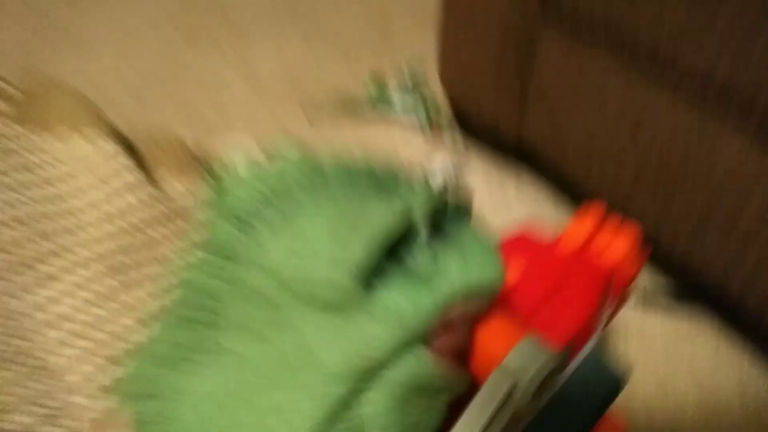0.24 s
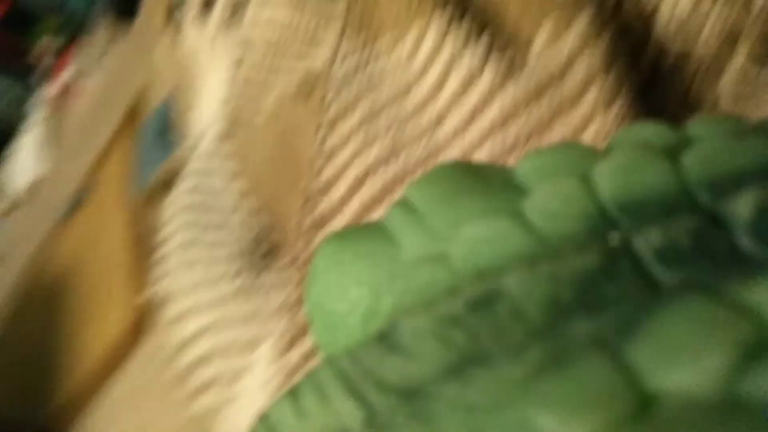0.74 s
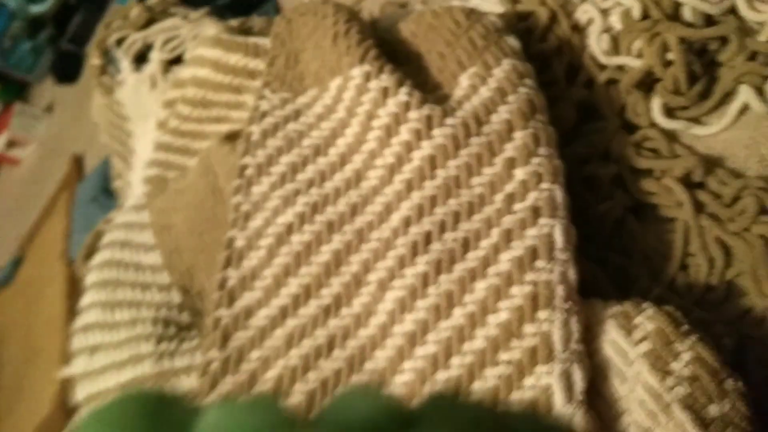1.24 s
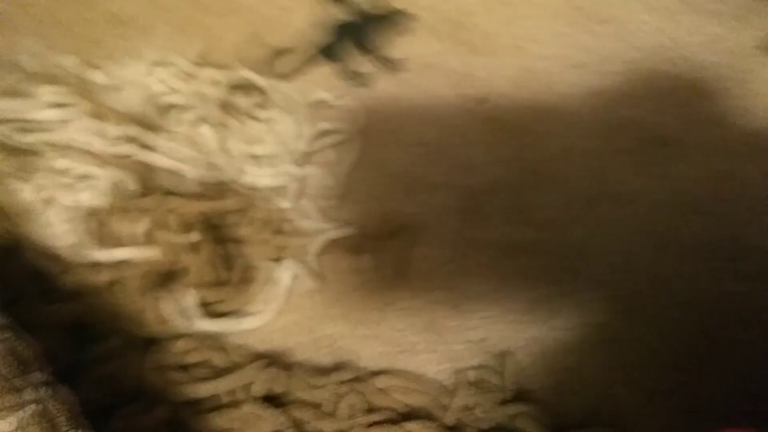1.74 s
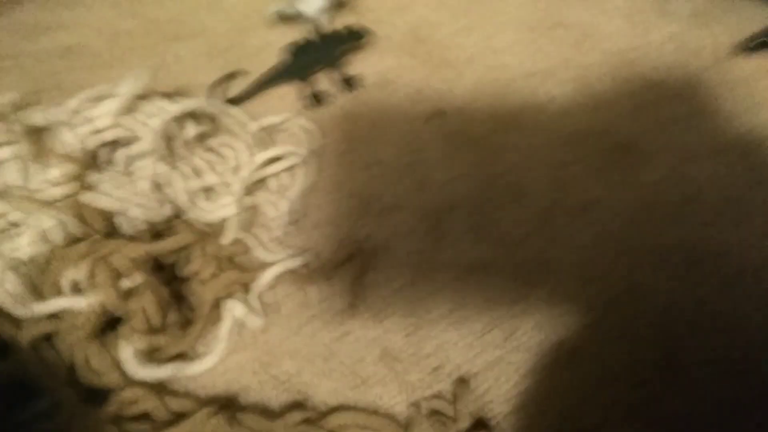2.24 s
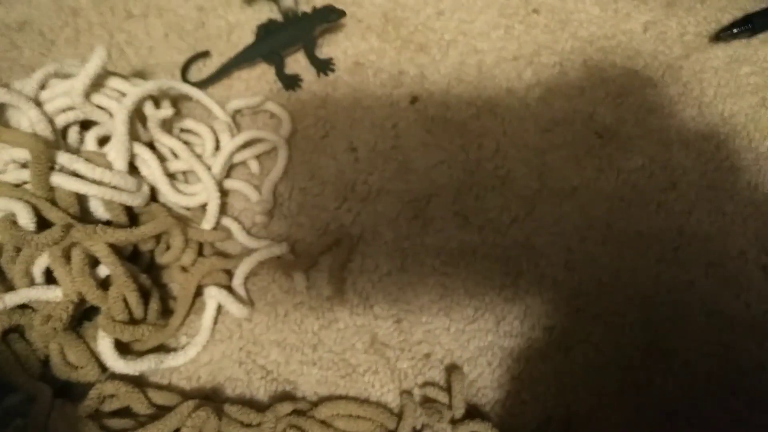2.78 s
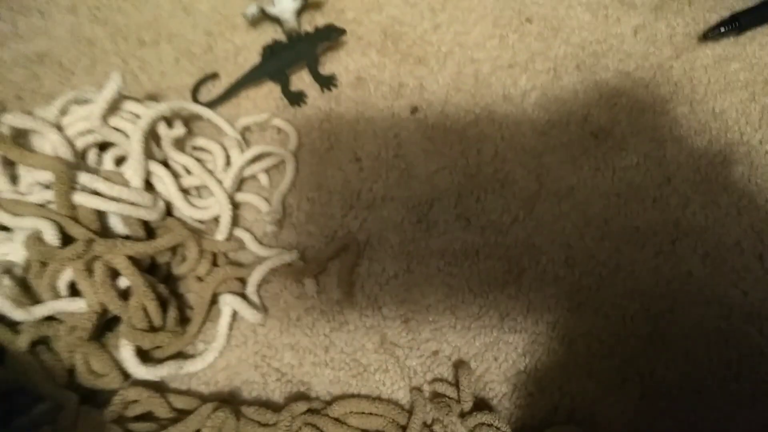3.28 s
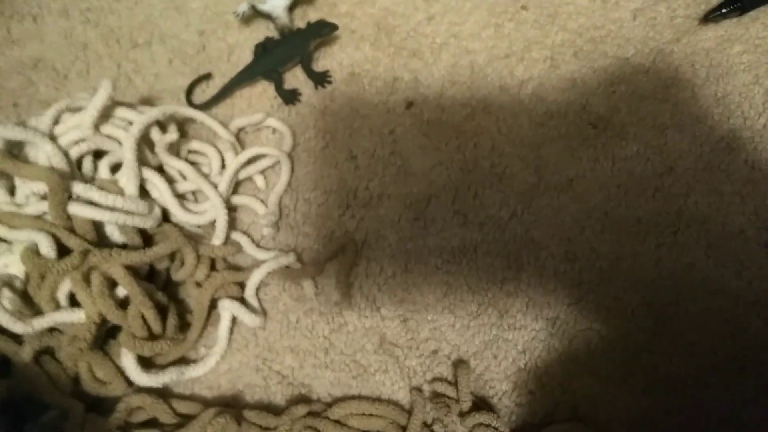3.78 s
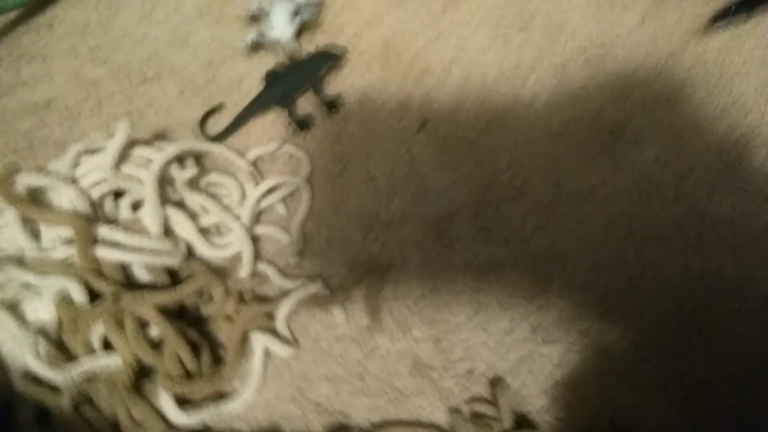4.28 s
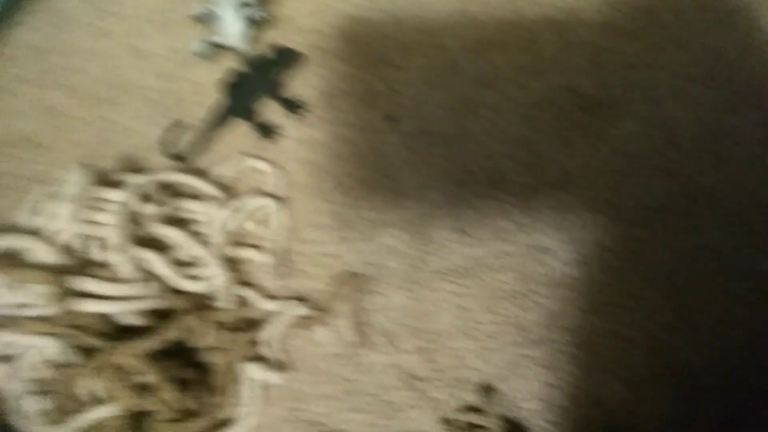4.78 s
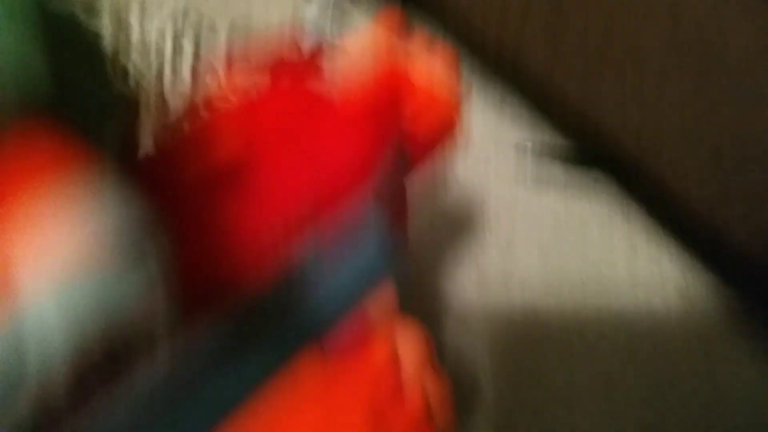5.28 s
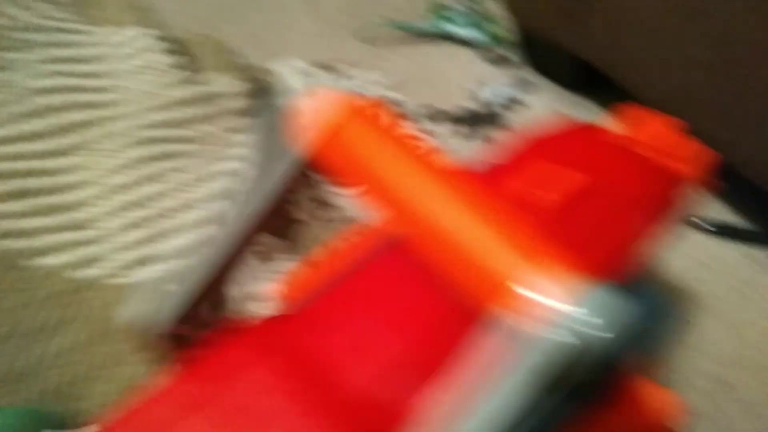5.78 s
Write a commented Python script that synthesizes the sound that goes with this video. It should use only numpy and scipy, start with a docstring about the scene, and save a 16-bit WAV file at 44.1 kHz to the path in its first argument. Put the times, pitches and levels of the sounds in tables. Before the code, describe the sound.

A hollow plastic toy is handled right against the microphone: scraping, sharp clacks and dull knocks, a quiet lull, another hard burst, then faint rustling.

```python
"""Hollow plastic toy in the hand

A hollow plastic toy is handled and dragged right next to a hand-held camera in a carpeted room.
Rubbing is random slips that ring the shell, with a fizz above and a rumble below.
Loose parts click: a blow and a short rattle ring the shell, plus a sharp tick and two high pings.
Knocks thump into the camera body as low swings that die quickly. A faint noise tail is the room.
The left channel is upside down, slightly late and duller than the right, and partly unlike it."""
import sys
import numpy as np
from scipy import signal
from scipy.fft import rfft, irfft, next_fast_len
from scipy.io import wavfile
from scipy.ndimage import uniform_filter1d

SR = 44100
rng = np.random.default_rng(int(sys.argv[2]) if len(sys.argv) > 2 else 0)


def materialize(psi):
    """Save the field psi as 16-bit PCM at rate SR to the path in sys.argv[1].

    A 1-D psi becomes a single channel; in a 2-D psi each row is a channel.
    """
    bounded = np.clip(np.atleast_2d(psi).T, -1, 1)
    quanta = np.round(bounded * 32767).astype(np.int16)
    wavfile.write(sys.argv[1], SR, quanta)


N = 265482

# Strokes of rubbing. Each row: peak time in seconds, swell time in seconds, scrape level in dB,
# fizz level in dB, rumble level in dB, pitch of the rubbed spot in Hz.
STROKES = [(0.0, .1, -40, -40, -43.5, 983), (0.099, 0.42, -62.5, -54, -58.5, 951),
           (.23, 0.11, -33.5, -42, -40.5, 1094), (0.329, 0.38, -42.5, -49, -41.5, 999),
           (.45, 0.29, -50.5, -51.5, -44.5, 893), (0.583, 0.14, -31.5, -44, -36.5, 595.5),
           (0.661, 0.15, -47.5, -42, -42.5, 907), (0.794, 0.21, -37, -45, -58.5, 1245),
           (0.963, 0.87, -42, -47.5, -45, 768), (1.101, 0.3, -37, -44.5, -41, 1034),
           (1.381, 0.042, -44.5, -71.5, -54, 1357), (1.528, 0.17, -61, -60.5, -48.5, 968),
           (1.667, 0.13, -36, -43.5, -35.5, 1234), (1.941, 0.11, -32, -48.5, -40.5, 1735),
           (2.088, 0.11, -34, -48.5, -45.5, 1790), (2.202, .05, -28, -41.5, -64.5, 1819),
           (2.298, 0.41, -46.5, -62, -54.5, 1530), (2.602, 0.44, -57.5, -64, -57, 1067),
           (3.349, 0.31, -54.5, -64.5, -61.5, 843), (3.682, 0.28, -52, -65.5, -61, 1686),
           (4.023, 0.58, -55.5, -60.5, -58, 963), (4.223, 0.11, -34, -45.5, -40, 698),
           (4.398, 0.036, -42, -70.5, -55.5, 1716), (4.479, 0.11, -34, -64.5, -61, 1782),
           (4.541, 0.12, -23.5, -59, -45.5, 1776), (4.61, 0.2, -21.5, -43, -36.5, 1724),
           (4.647, 0.16, -39, -37.5, -41.5, 1075), (4.892, 0.13, -46.5, -51.5, -59, 1035),
           (5.42, 0.15, -53, -54, -85, 927), (5.635, 0.057, -54.5, -62, -67, 900),
           (5.719, 0.15, -50, -63, -61, 794), (5.919, 0.15, -54, -54.5, -58, 792),
           (6.03, 0.072, -50.5, -48.5, -52, 885)]
# How deeply each layer follows a stroke's rise and fall: shares for scrape, fizz and rumble.
FOLLOW_SHARES = (0.85, 0.71, 0.58)
# The faint steady floor between strokes: levels of scrape, fizz and rumble in dB.
REST_FLOOR_DB = (-90, -82, -79)
# Modes (natural tones) of the shell. Each row: pitch in Hz, width in Hz, level in dB.
SHELL_MODES = [(601.4, 158, -3.5), (862.5, 119, -0.5), (970.7, 84, 2), (1133, 136, 0), (1259.5, 55, 3),
               (1433, 130, -2), (1634, 74, 2), (1801, 99, -0.5), (1964, 70, 2.5), (2387, 140, 1.5),
               (2870, 270, -6), (3105, 190, -7.5), (3465, 370, -14), (4740, 820, -21.5)]
# The two large panels of the shell. Each row: pitch in Hz, level under a blow in dB.
PANELS = [(960, -13), (1850, -12.5)]
# Tone colour of the fizzing fibres. Each row: frequency in Hz, relative level in dB.
FIZZ_COLOUR = [(2200, 5.5), (3300, 0.5), (5500, -6.5), (9500, -14), (16500, -18)]
# Tone colour of low rumble. Each row: frequency in Hz, relative level in dB.
RUMBLE_COLOUR = [(30, -26.5), (70, 7), (140, 5), (300, -0.5), (500, -1.5), (800, -40)]
# Parts striking the shell. Each row: time in seconds, level in dB, pitch of the struck part in Hz,
# time for the rattle to fall 60 dB in seconds, level of the tick against the ring in dB.
CLICKS = [(0.201, -21, 1045, 0.076, -16), (0.231, -33, 1069, 0.13, -2.5), (.286, -21, 1252, 0.11, -9.5),
          (0.316, -17.5, 3295, 0.06, -45), (0.407, -33.5, 4395, 0.046, 5.5), (.504, -32.5, 2910, 0.024, -6),
          (0.533, -11, 916, 0.023, -16), (0.645, -23.5, 759, 0.02, -30), (0.689, -18.5, 1347, 0.1, -47),
          (0.723, -22, 1354, 0.091, -10.5), (0.772, -16, 1234, 0.019, -19),
          (0.835, -32.5, 1378, 0.032, -23), (0.91, -18.5, 934, 0.035, -16.5),
          (0.919, -19, 2492, 0.018, -7.5), (1.04, -22.5, 1197, 0.092, -5), (1.049, -9, 934, 0.05, -13),
          (1.088, -23.5, 957, 0.023, -40), (1.145, -22.5, 2915, 0.029, -15),
          (1.172, -11.5, 938, 0.084, -17), (1.191, -7.5, 1055, 0.018, -1.5), (1.347, -31, 1367, 0.23, -24),
          (1.398, -36.5, 1360, 0.1, -16), (1.462, -41, 898, 0.048, -26), (1.496, -38.5, 860, 0.02, -17),
          (1.535, -38, 876, 0.0052, -6.5), (1.589, -14, 2164, 0.023, -12), (1.676, -16, 2054, 0.022, -7.5),
          (1.697, -34.5, 2920, 0.022, -1), (1.727, -30, 2550, .04, -27), (1.777, -33.5, 979, 0.038, -32),
          (1.82, -16, 1248, 0.065, -62), (1.87, -21.5, 1694, 0.093, -27), (1.923, -7.5, 1735, 0.077, -21),
          (2.053, -20.5, 1855, 0.062, -20), (2.09, -4, 1879, 0.017, -9), (2.115, -17.5, 1764, 0.014, -22),
          (2.157, -5, 2145, 0.051, -13.5), (2.183, -18.5, 1698, 0.045, -21),
          (2.201, -11, 1640, 0.049, -10.5), (2.239, -19, 3213, 0.015, -11.5), (2.323, -35, 1870, 0.15, -36),
          (2.435, -37.5, 1777, 0.14, -41), (2.507, -31.5, 1830, 0.033, -14),
          (2.572, -17, 1763, 0.029, -10.5), (2.669, -37, 1980, 0.095, -29),
          (2.695, -37.5, 972, 0.021, -41.5), (2.727, -41, 1043, 0.011, -25.5),
          (2.752, -27, 1019, 0.037, -19.5), (2.764, -7.5, 1691, 0.015, -6), (2.776, -24, 1049, 0.058, -3.5),
          (2.922, -29.5, 941, 0.055, -18), (2.983, -40, 944, 0.056, -34),
          (3.027, -46.5, 1040, 0.047, -22.5), (3.089, -33.5, 901, 0.097, -33.5),
          (3.179, -36.5, 897, 0.037, -41.5), (3.236, -34.5, 924, 0.047, -33),
          (3.274, -34.5, 1895, 0.024, -49), (3.321, -37.5, 1843, 0.092, -27.5),
          (3.383, -34.5, 1510, 0.043, -26), (3.6, -33, 1754, 0.055, -18), (3.681, -30, 1794, 0.15, -16.5),
          (3.701, -24.5, 2106, 0.028, -12), (3.815, -38, 1550, 0.096, -29), (3.879, -34, 1930, 0.0066, -37),
          (3.907, -32, 1870, 0.069, -41), (3.946, -32, 1774, 0.016, -39), (3.984, -31, 1915, 0.26, -26),
          (4.046, -28.5, 2100, 0.047, -22), (4.117, -31.5, 1793, 0.08, -48),
          (4.153, -26.5, 2057, 0.027, -26), (4.181, -35.5, 2940, 0.025, -14),
          (4.198, -32, 1644, 0.029, -30), (4.214, -6, 1017, 0.024, -9.5), (4.234, -14.5, 1788, 0.037, -35),
          (4.384, -28, 1990, 0.094, -59), (4.465, -23, 1784, 0.12, -103), (4.517, -23, 1876, 0.056, -35),
          (4.559, -12, 1867, 0.18, -16.5), (4.576, -13.5, 1850, 0.036, -24),
          (4.626, -4.5, 1798, 0.085, -14), (4.639, -5, 782, 0.073, -7.5), (4.691, -34.5, 1730, 0.023, -21),
          (4.87, -14, 1070, 0.027, 0), (5.057, -39.5, 3480, 0.037, -28), (5.275, -48.5, 2770, 0.089, -11),
          (5.311, -45.5, 860, 0.05, -25), (5.369, -38.5, 1530, 0.023, -8), (5.392, -42, 970, .08, -18.5),
          (5.648, -32.5, 855, 0.034, -33), (5.686, -47.5, 826, 0.029, -28.5), (5.704, -54, 983, 0.04, -34),
          (5.743, -39, 999, 0.1, -21), (5.877, -36, 924, 0.045, -56.5), (5.903, -37, 864, 0.069, -7.5),
          (5.978, -40.5, 848, 0.15, -24)]
# Thin rods inside that ring on faintly after a strike. Each row: pitch in Hz, typical level in dB,
# time to fall 60 dB in seconds.
RODS = [(1072, -38.5, 0.24), (1330, -39.5, 0.17), (1670, -37.5, 0.088)]
# Tone colour of the sharp tick. Each row: frequency in Hz, relative level in dB.
TICK_COLOUR = [(2200, -3), (3500, 4.5), (6500, -4), (13500, -7), (16500, -11)]
# Knocks felt through the camera body. Each row: time in seconds, peak level in dB, pitch in Hz,
# time to fall 60 dB in seconds (used as at least 0.01).
THUMPS = [(0.534, -12, 480, 0.054), (0.556, -22.5, 385, 0.13), (0.61, -16.5, 379, 0.013),
          (0.91, -13.5, 341.5, 0.075), (0.938, -16.5, 280.6, 0.052), (1.046, -14, 185.4, 0.041),
          (1.588, -15.5, 157, 0.043), (1.639, -24.5, 435, 0.074), (1.669, -17, 352, 0.058),
          (1.673, -16, 141.1, 0.11), (2.089, -14, 361, 0.013), (2.09, -17, 111.4, 0.017),
          (2.155, -29, 348.4, 0.062), (2.763, -15.5, 101, 0.047), (3.14, -29, 227, 0.0073),
          (4.115, -26, 278.6, 0.019), (4.211, -24.5, 499.6, 0.075), (4.639, -7, 617, 0.03),
          (4.824, -30, 171.2, 0.056), (4.868, -26, 87.6, 0.021), (5.114, -43.5, 241, 0.081),
          (5.272, -35, 131.1, 0.13)]
# A tiny hard part that pings. Each row: start in seconds, level in dB.
PINGS = [(2.0901, -24.5), (2.7625, -20.5)]
# How alike the two channels are. Each row: frequency in Hz, likeness from 0 to 1 before scattering.
LIKENESS = [(150, 0.97), (2300, 0.99), (9000, 0.88), (15000, 0.99)]
# Tone colour of the left channel. Each row: frequency in Hz, level in dB.
LEFT_COLOUR = [(200, -0.5), (2000, -2.5), (10000, -4), (14000, -8.5)]
# How far the left bass trails. Each row: frequency in Hz, phase delay in radians.
LEFT_TRAILING = [(40, 0.39), (450, 0.48), (1500, 0.039)]

# A stroke swells to its peak, then dies at one speed; FOLLOW_SHARES scales both numbers.
SWELL_DB, FADE_DB_PER_S = 32, 381.5
FAR_DB = -12  # floor for modes far from the rubbed spot
DETUNE, UNEVEN_DB = 0.04, 4  # no two blows land alike: spread of mode pitch (share) and strength
SAG, SAG_S = 0.033, 0.011  # a knock starts high by this share of its pitch and sags in this time
PING_HZ, PING_T60_S = 9690, 0.031  # T60 is the time to fall 60 dB
ROOM_DB, ROOM_T60_S = -27, 0.26
LAG = 20  # samples by which the left channel is late
EDGE_HZ = 16600  # upper limit of the sound


def gain_of(db):
    """Turns decibels into amplitude."""
    return 10 ** (np.asarray(db) / 20)


def evened(x):
    """Scales to an rms (average strength) of one."""
    return x / np.sqrt(np.mean(x ** 2) + 1e-20)


def peaked(x):
    """Scales so the highest peak is one."""
    return x / np.max(abs(x))


def read(points, hz):
    """Reads a curve between its points, on a log-frequency axis."""
    f, value = np.transpose(points)
    return np.interp(np.log(hz + 1), np.log(f + 1), value)


def add(mix, s, sound):
    """Mixes a sound in at time s, in seconds."""
    part = mix[max(round(s * SR), 0):][:len(sound)]
    part += sound[:len(part)]


def bins(count):
    """Lists the frequencies of a real Fourier transform, in Hz."""
    return np.fft.rfftfreq(count, 1 / SR)


def coloured(x, points):
    """Filters a sound by a tone colour given in Hz and dB."""
    gain = gain_of(read(points, bins(len(x))))
    return irfft(rfft(x) * gain, len(x))


def modes(count, tuning=1):
    """Gives each shell mode's resonance as a complex response, one row a mode."""
    f, width, db = np.transpose(SHELL_MODES)
    signed_gain = (-1) ** np.arange(len(SHELL_MODES)) * gain_of(db)  # neighbours take opposite signs
    off_pitch = bins(count) - (f * tuning)[:, None]
    return signed_gain[:, None] / (1 + 2j * off_pitch / width[:, None])


def rung(spot_hz, slope_db, least_db):
    """Gives each mode's gain: modes far in pitch from the touched spot ring less."""
    octaves = np.log2(np.transpose(SHELL_MODES)[0][:, None] / spot_hz)
    return gain_of(np.maximum(-slope_db * abs(octaves), least_db))


def strokes(count):
    """Shapes the rubbing: three layer levels, and the spot pitch averaged by scrape power."""
    t = np.arange(0, count / SR + .002, .001)
    s, swell, scrape_db, fizz_db, rumble_db, hz = np.transpose(STROKES)[:, :, None]
    rise_db = -SWELL_DB * np.maximum(s - t, 0) / swell
    shape_db = rise_db - FADE_DB_PER_S * np.maximum(t - s, 0)
    powers = [gain_of(2 * (db + share * shape_db))
              for db, share in zip((scrape_db, fizz_db, rumble_db), FOLLOW_SHARES)]
    spot_hz = (powers[0] * hz).sum(0) / (powers[0].sum(0) + 1e-300)
    levels = [np.sqrt(p.sum(0) + gain_of(2 * db)) for p, db in zip(powers, REST_FLOOR_DB)]
    curves = (*levels, np.maximum(spot_hz, 500))
    return (np.interp(np.arange(count) / SR, t, curve) for curve in curves)


def slipping(chance, per_s, spread_db, fade_s):
    """Makes random slips of uneven size, each fading in a few milliseconds."""
    happens = chance[1] < per_s / SR
    size = gain_of(spread_db * np.minimum(-np.log(chance[0] + 1e-9), 3)) * happens
    return signal.lfilter([1], [1, -np.exp(-1 / (fade_s * SR))], size)


def rubbing():
    """Stick-slip grains ring the whole shell or one mode; fibres fizz above, with a rumble below."""
    count = next_fast_len(N, True)
    scrape_gain, fizz_gain, rumble_gain, spot_hz = strokes(count)
    slips = .35 + slipping(rng.random((2, count)), 380, 3.8, .002)
    # each of these contacts catches a single mode
    contacts = .8 * slipping(rng.random((2, len(SHELL_MODES), count)), 45, 3.6, .005)
    scrape_noise, fizz_noise, rumble_noise = rng.standard_normal((3, count))

    # rubbing stirs the panels 7 dB more than the table says
    panels = np.max([gain_of(db + 7.0) * rung(hz, 44.0, -13.0) for hz, db in PANELS], axis=0)
    spot = np.maximum(rung(spot_hz, 16.0, FAR_DB), panels)
    spot_share = spot / np.linalg.norm(spot, axis=0)
    grains = scrape_noise * (slips + contacts)
    rings = irfft(rfft(grains) * modes(count), count) * spot_share

    scrape = evened(rings.sum(0))
    fizz = evened(coloured(fizz_noise * np.sqrt(slips), FIZZ_COLOUR))
    rumble = evened(coloured(rumble_noise * np.sqrt(slips), RUMBLE_COLOUR))
    return (scrape_gain * scrape + fizz_gain * fizz + rumble_gain * rumble)[:N]


def room(x):
    """The carpeted room answers with a short, dull tail of fading noise."""
    t = np.arange(SR // 2) / SR
    dull_noise = uniform_filter1d(rng.standard_normal(len(t)), size=4)
    tail = dull_noise * gain_of(-60 * t / ROOM_T60_S)
    return gain_of(ROOM_DB) * signal.fftconvolve(x, tail / np.linalg.norm(tail))[:N]


def clicks():
    """A blow and a rattle ring the struck part, the panels and the rods, and add a sharp tick."""
    out, t = np.zeros(N), np.arange(8192) / SR
    noise = rng.standard_normal((len(CLICKS), 2, len(t)))
    landing = rng.standard_normal((len(CLICKS), 2, len(SHELL_MODES)))
    rods = np.array([gain_of(db - 60 * t / t60) * np.sin(2 * np.pi * hz * t) for hz, db, t60 in RODS])
    panels = np.max([gain_of(db) * rung(hz, 81.0, -13.5) for hz, db in PANELS], axis=0)
    ending = np.minimum((t[-1] - t) / .04, 1) ** 2  # fades the cut end to silence
    for (s, db, hz, t60, tick_db), (shake, tick_noise), (shift, uneven) in zip(CLICKS, noise, landing):
        dying = gain_of(-60 * t / max(t60, .004))
        settling = gain_of(-40.0 - 60 * t / 0.07)  # loose parts come to rest after the blow
        blow = 3.47 * np.exp(-t / 0.000056)
        rattle = shake * (1 - np.exp(-t / 0.000083)) * (dying + settling) + blow

        uneven_panels = panels * gain_of(UNEVEN_DB * uneven)[:, None]
        parts = np.maximum(rung(hz, 57.0, -14.0), uneven_panels)
        shell = modes(len(t), 1 + DETUNE * np.tanh(shift))
        ring = peaked(irfft(rfft(rattle) * (shell * parts).sum(0)))

        # rods buzz loosely: slow noise varies their strength
        buzz = evened(uniform_filter1d(tick_noise, 300))
        hum = buzz * (gain_of(UNEVEN_DB * shift[:len(RODS)]) @ rods)

        # each part has its own high resonances: random bumps along the frequency axis
        bumps = evened(uniform_filter1d(shake[:len(t) // 2 + 1], size=70))
        bumpy_noise = irfft(rfft(tick_noise) * gain_of(7.5 * np.tanh(bumps)))
        tick_shape = (1 - np.exp(-t / 0.00049)) * (dying ** 0.95 + 2.4 * settling)
        tick = peaked(coloured(bumpy_noise, TICK_COLOUR) * tick_shape)
        add(out, s - .002, gain_of(db) * ending * (ring + hum + gain_of(tick_db) * tick))
    return out


def thumps():
    """Each knock is a low, sagging swing that dies quickly, its start softened by the contact."""
    out, t = np.zeros(N), np.arange(8192) / SR
    noise = rng.standard_normal((len(THUMPS), len(t)))
    sagging_t = t + SAG * SAG_S * (1 - np.exp(-t / SAG_S))
    for (s, db, hz, t60), shake in zip(THUMPS, noise):
        swing = np.sin(2 * np.pi * hz * sagging_t)
        swing += 0.26 * evened(coloured(shake, RUMBLE_COLOUR))
        smooth = uniform_filter1d(uniform_filter1d(uniform_filter1d(shake, 12), 16), 20)
        swing += .5 * evened(smooth) * np.exp(-t / .004)  # rough first contact
        soft_start = (1 - np.exp(-t * hz / 0.23)) ** 2
        shape = soft_start * gain_of(-60 * t / max(t60, .01))
        add(out, s - .001, gain_of(db) * peaked(swing * shape))
    return out


def pings():
    """Each ping is one high, quickly dying ring with a slight flutter."""
    out, t = np.zeros(N), np.arange(4096) / SR
    noise = rng.standard_normal((len(PINGS), len(t)))
    for (s, db), shake in zip(PINGS, noise):
        flutter = 1 + .5 * evened(uniform_filter1d(shake, size=60))
        ring = flutter * np.sin(2 * np.pi * PING_HZ * t)
        onset = np.minimum(t / 0.00048, 1)
        add(out, s, gain_of(db - 60 * t / PING_T60_S) * onset * ring)
    return out


def scene():
    """All sources sit close to the camera; its two ports hear the treble differently."""
    near = clicks() + thumps() + rubbing()
    near = near + room(near) + pings()
    hz, _, z = signal.stft(near, SR, nperseg=128)
    alike = np.clip(read(LIKENESS, hz), 0, 1)[:, None]
    scatter = np.exp(2j * np.pi * rng.random(z.shape))  # random phases make one port differ
    mixed = z * (alike + 2.6 * np.sqrt(1 - alike ** 2) * scatter)
    other = signal.istft(mixed, SR, nperseg=128)[1][:N]
    # the deepest bass is cut away below about 62 Hz
    return signal.lfilter(*signal.butter(2, 62., "high", fs=SR), [other, near])


def record(dry):
    """Turns the left upside down, late and duller with trailing bass; adds hiss and limits the band."""
    padded = np.pad(dry[0], (LAG, next_fast_len(N + 999, True) - N - LAG))
    late = coloured(padded, LEFT_COLOUR)
    trailing = np.exp(-1j * read(LEFT_TRAILING, bins(len(late))))
    left = -irfft(rfft(late) * trailing, len(late))[:N]
    right = dry[1]
    hiss = gain_of(-90.5) * rng.standard_normal((2, N))
    wired = np.clip(np.array([left, right]) + hiss, -1, 1)
    band_limit = signal.firwin(511, EDGE_HZ, window=("kaiser", 9), fs=SR)
    return signal.oaconvolve(wired, band_limit[None], "same")


dry = scene()
out = record(dry)
materialize(out)
```